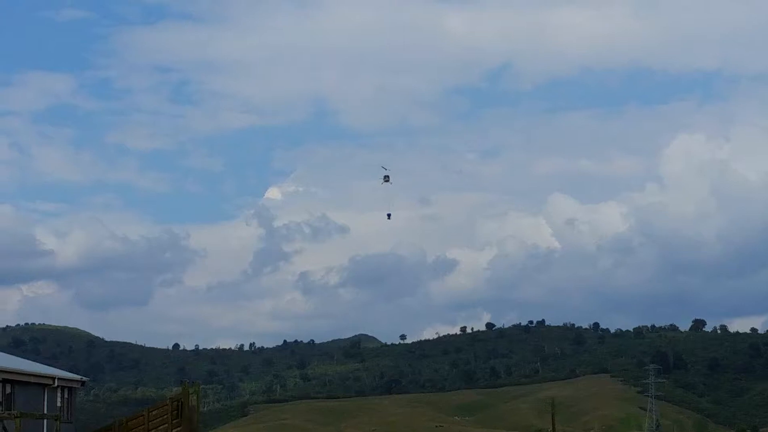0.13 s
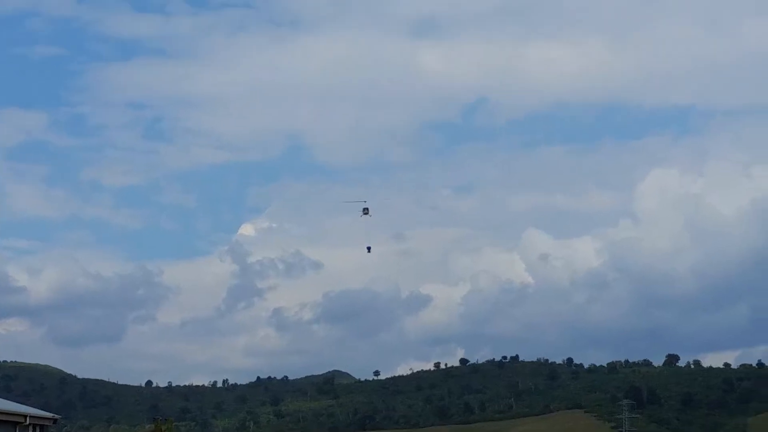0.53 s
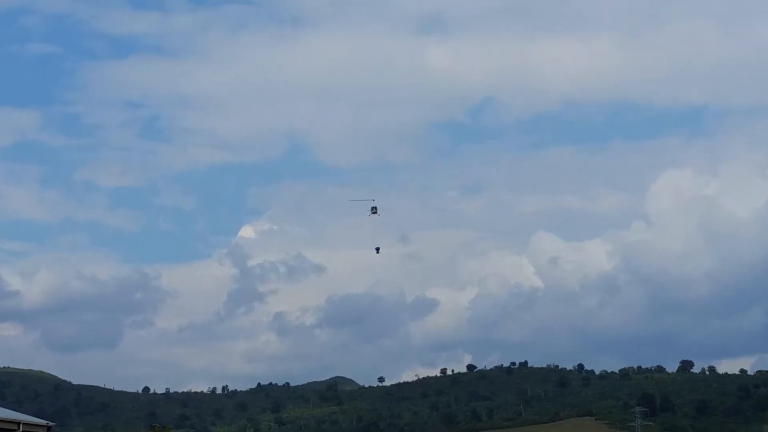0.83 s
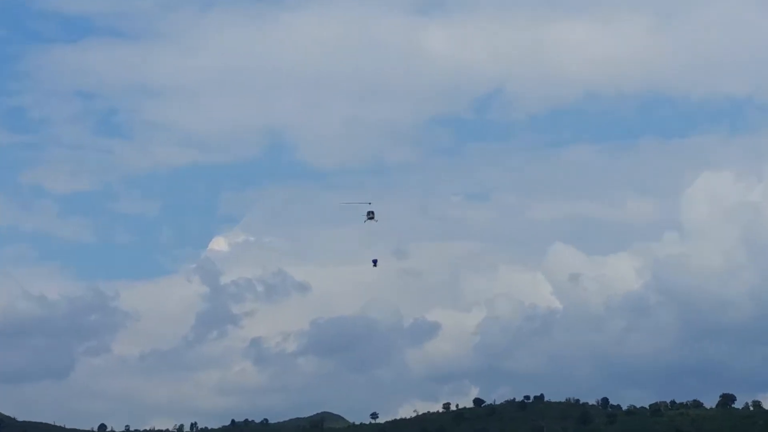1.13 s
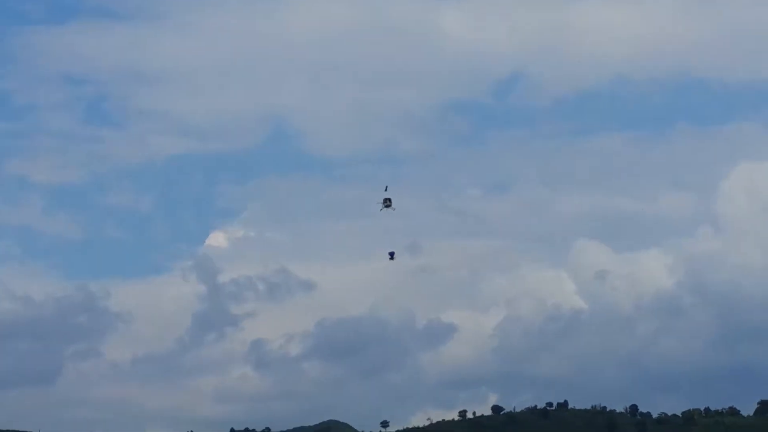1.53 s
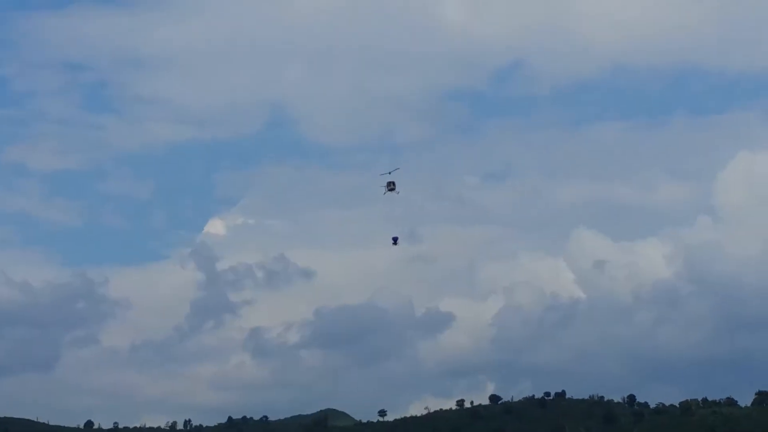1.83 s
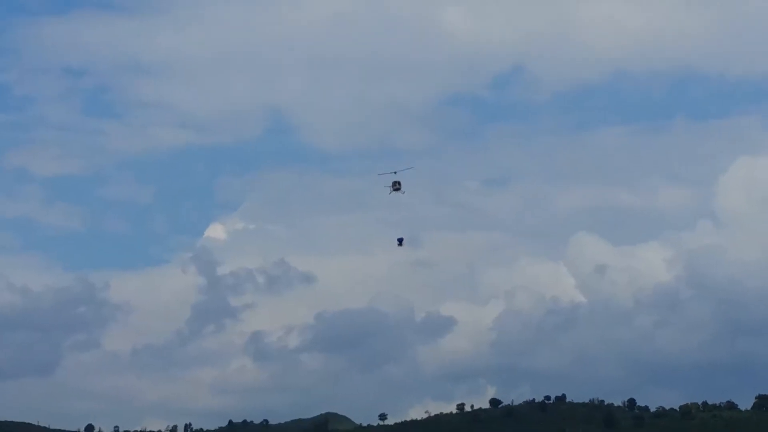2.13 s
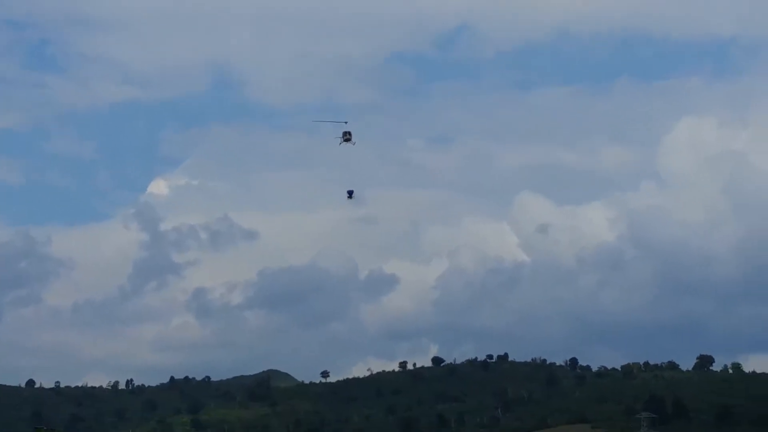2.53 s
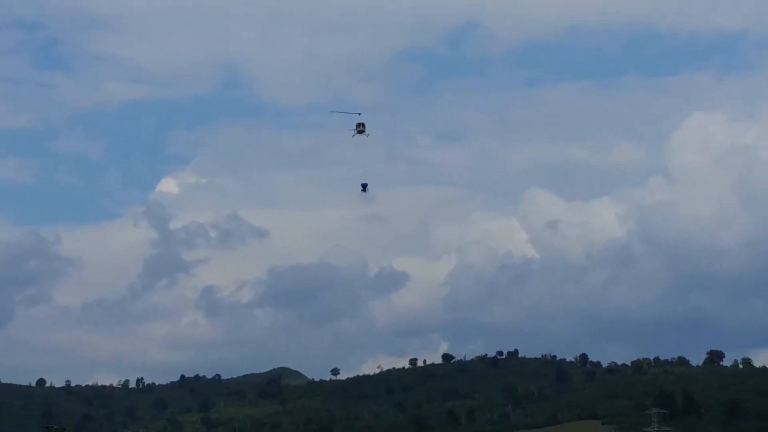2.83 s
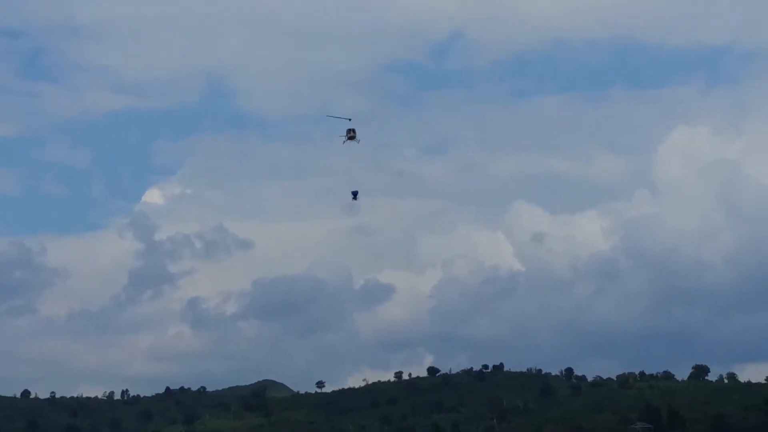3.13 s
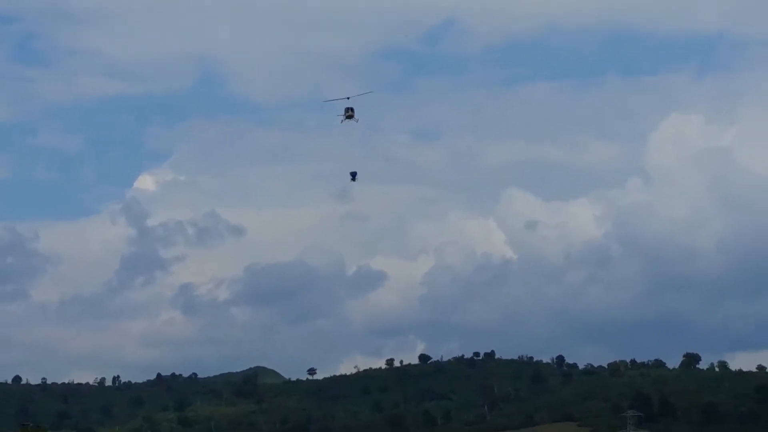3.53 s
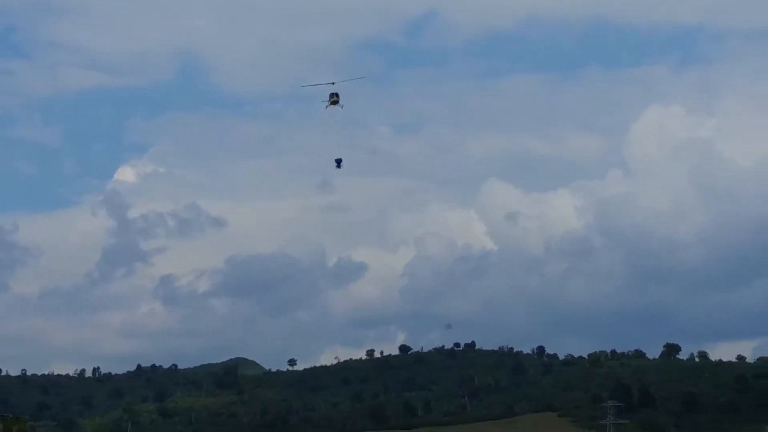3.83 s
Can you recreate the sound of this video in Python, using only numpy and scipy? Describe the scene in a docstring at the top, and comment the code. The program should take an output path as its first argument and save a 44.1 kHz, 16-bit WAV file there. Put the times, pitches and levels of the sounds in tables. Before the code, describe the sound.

Outdoor stereo pickup of a distant helicopter coming closer: steady fast blade thumps, increasingly crisp slaps, engine drone and turbine hiss, thin insect chirps on the left, one tiny close tick early on.

```python
"""Open country, with a two-bladed helicopter coming nearer ahead of the microphone and insects to the left.
After near silence the sound fades in. Each blade pass is a sharp decaying slap of sines, a gated noise swish
and a low thump of filtered pulses, over wavering tail rotor and drive train tones. Rotor wash, turbine,
breeze and the far insect chorus are shaped noise; near insects are scrapes ringing a resonant wing.
One small double tick falls close to the microphone."""
import sys
import numpy as np
from scipy import signal
from scipy.fft import rfft, irfft
from scipy.io import wavfile

SR = 44100
rng = np.random.default_rng(int(sys.argv[2]) if len(sys.argv) > 2 else 0)


def output_pcm(signal):
    """Save a mono or channel-first signal as 16-bit PCM at the path in sys.argv[1].

    Samples are clipped to [-1, 1] before scaling.
    """
    pcm = np.clip(np.atleast_2d(signal).T, -1, 1) * 32767
    wavfile.write(sys.argv[1], SR, np.round(pcm).astype(np.int16))


N = 176400
TIME = np.arange(N) / SR  # seconds
FREQS = np.maximum(np.arange(N // 2 + 1) * SR / N, 1)  # Hz

# Fade-in at the microphone. Each row: time in seconds, level in dB.
FADE = [(0, -89), (.33, -75), (.405, -76), (.424, -28.5), (.47, -14.5), (.55, -7.5), (.62, -2.3)]
CUTOFF_HZ = 14700

# Left minus right of the airborne noise. Each row: frequency in Hz, difference in dB.
BALANCE_DB = [(60, 0), (700, -3), (1200, 2.5), (1550, 1), (1900, -7), (2600, -4.5), (3300, -0.5), (3900, 7),
              (4700, 6.5), (5400, 0)]
# Likeness of left and right. Each row: frequency in Hz, correlation from -1 to 1.
LIKENESS = [(60, -0.067), (160, 0.97), (440, 1), (720, 0.86), (1180, 0.2), (1940, -0.34), (3200, 0.35),
            (5200, -0.58)]
ROTOR_PAN_DB, INSECT_PAN_DB, CHORUS_PAN_DB = -1.0, 20, 8  # left minus right

# Breeze on the microphone, before its level. Each row: frequency in Hz, density in dB per Hz.
BREEZE = [(12, -82), (25, -63.5), (45, -64), (90, -62.5), (150, -73), (200, -77), (280, -70), (350, -73),
          (450, -85), (800, -105)]
# Course of this low two-sided rumble: dips slightly, then rises. Each row: time in seconds, level in dB.
BREEZE_LEVEL = [(.6, -1), (1.8, -1.5), (2.6, -2), (4, 2)]

# Tail rotor harmonics, before waver and course. Each row: multiple of the fundamental, level in dB rms.
TAIL_ORDERS = [(1, -36), (2, -39.5), (3, -43), (4, -49), (5, -61)]
TAIL_HZ = 87.35
# Engine and gearbox tones, before waver and course. Each row: frequency in Hz, level in dB rms.
DRIVE_TONES = [(48.1, -40.5), (96.2, -42), (108.3, -43), (144.4, -40), (147.1, -41), (158.2, -51),
               (172.8, -51), (180.5, -49.5), (204.6, -49.5), (216.6, -55), (228.6, -49.5), (294.1, -44),
               (343.1, -51)]
TONE_WAVER_DB, TONE_WANDER_RAD, TONE_WAVER_HZ = 1.9, 0.23, 2.0
# Course of the drone, louder overall as the helicopter nears. Each row: time in seconds, level in dB.
DRONE_LEVEL = [(.45, -2), (.8, -1.5), (1.2, -0.5), (1.7, 0), (2.2, -0.5), (3, 1.5), (4, 2)]

# Rotor wash, before its level. Each row: frequency in Hz, density in dB per Hz.
WASH = [(15, -96), (35, -66), (60, -65), (110, -61.5), (160, -61.5), (200, -65.5), (300, -67.5), (400, -70),
        (500, -77), (680, -73), (950, -79.5), (1200, -77.5), (1500, -90.5), (1800, -82), (2200, -92),
        (3000, -110)]
# Course of the wash. Each row: time in seconds, level in dB.
WASH_LEVEL = [(.6, -2.5), (1.5, 1), (2.5, 1), (3.3, 1), (3.7, 3.5), (4, 2.5)]
WASH_FLUTTER_DB, WASH_FLUTTER_HZ = 1, 26.7
# Turbine hiss, before its level. Each row: frequency in Hz, density in dB per Hz.
TURBINE = [(1500, -105), (2200, -94.5), (2550, -85), (3050, -96.5), (3500, -90.5), (3950, -81.5),
           (4300, -88), (4800, -90.5), (5300, -99), (5600, -113), (5900, -132), (7000, -138), (10000, -138)]
# Course of the hiss. Each row: time in seconds, level in dB.
HISS_LEVEL = [(.42, 0), (.55, -6), (.7, 0), (2, 1), (3.2, 0.5), (4, 1.5)]
# Turbine whine, before its level. Each row: frequency in Hz, density in dB per Hz.
WHINE = [(3050, -105), (3340, -76.5), (3650, -100), (5500, -122)]
# The whine emerges as the helicopter nears. Each row: time in seconds, level in dB.
WHINE_LEVEL = [(.6, -24), (3.1, -18), (3.55, -4), (4, -1)]

# Far insect chorus, before its swell. Each row: frequency in Hz, density in dB per Hz.
CHORUS = [(10000, -138), (10500, -122), (10900, -105), (11600, -103), (12400, -94), (13500, -99),
          (14500, -100), (16000, -115)]
# Swell of the chorus. Each row: time in seconds, level in dB.
CHORUS_LEVEL = [(.6, -1), (2, 1), (3.2, -1.5), (4, 2)]

# Lateness of the blade passes as the path changes. Each row: time in seconds, delay in ms.
PATH_DELAY = [(.4, -3.5), (.7, -2.5), (1.0, -1), (1.6, 0.12), (2.05, 2), (2.6, 0.5), (3.1, 2.23), (4, 0.85)]
PASS_HZ, FIRST_PASS_S = 14.6994, 0.4028  # before that lateness

# Swish of a blade pass, before gate and level. Each row: frequency in Hz, density in dB per Hz.
SWISH = [(350, -82.5), (500, -65), (680, -77), (1000, -79.5), (1220, -76.5), (1480, -86.5), (1660, -74),
         (1820, -68), (2000, -82), (2230, -81), (2550, -77.5), (2750, -83.5), (3100, -89.5), (4000, -85.5),
         (5000, -92), (5700, -125)]
# Course of the swish. Each row: time in seconds, level in dB.
SWISH_LEVEL = [(.6, -13), (1.5, -2.5), (2.2, -3.5), (2.65, 3), (3.2, 2), (3.7, 2.5), (4, 0.5)]
SWISH_START_S = -0.0017  # against the slap
SWISH_ATTACK_S, SWISH_HOLD_S, SWISH_RELEASE_S = 0.0026, 0.0098, .0045  # hold counts from the start

# Slap strength of the first blade. Each row: time in seconds, level of the main burst in dB.
SLAP_BLADE_A = [(.6, -34), (.8, -32), (1.22, -34.5), (1.355, -28), (1.49, -20.5), (1.63, -20),
                (1.76, -31.5), (2.04, -30.5), (2.17, -29), (2.31, -26), (2.44, -25.5), (2.58, -19),
                (2.72, -21), (2.85, -19.5), (3.12, -25), (3.26, -23.5), (3.67, -19), (3.94, -24)]
# Slap strength of the second blade. Each row: time in seconds, level of the main burst in dB.
SLAP_BLADE_B = [(0.6, -48), (1.02, -37), (1.42, -41), (1.559, -29.5), (1.70, -23.5), (1.83, -36),
                (1.97, -26.5), (2.10, -27.5), (2.24, -23.5), (2.38, -39), (2.51, -24.5), (2.651, -31.5),
                (2.78, -27.5), (2.92, -27), (3.062, -31.5), (3.33, -26), (3.46, -27.5), (3.6, -24.5),
                (3.87, -28)]
SLAP_HZ, SLAP_RISE_S, SLAP_FALL_S, SLAP_PITCH_SPREAD = 690, 0.0022, 0.002, 0.03
# Parts of the slap, in dB against the main burst
SLAP_CRACK_HZ, SLAP_CRACK_DB = 1180, -17
SLAP_BODY_HZ, SLAP_BODY_DB = 394, -9
SLAP_RING_HZ, SLAP_RING_DB, SLAP_RING_LAG_S = 1778, -28, 0.0012
ECHO_LAG_S, ECHO_LAG_SPREAD_S, ECHO_DB = 0.00504, .0006, -14.5  # ground reflection, dB against the slap

# Thump of a blade pass, before its course. Each row: frequency in Hz, level of a harmonic there in dB rms.
THUMP = [(15, -63), (29, -45.5), (44, -44.5), (59, -40), (73, -36), (88, -39), (103, -48), (118, -40.5),
         (132, -48.5), (162, -53), (190, -60.5), (260, -57.5), (320, -59), (400, -61), (500, -77.5),
         (700, -100)]
# Course of the thump. Each row: time in seconds, level in dB, lag behind the slap in ms.
THUMP_COURSE = [(.5, -1, 7), (1.1, -2, 6.8), (1.65, 2.5, 6.2), (2.1, 1, 7), (2.45, -1.5, 6.5),
                (2.95, 3, 8.05), (3.4, 1, 7.8), (4, 1.5, 10)]
THUMP_SKEW_RAD, THUMP_SPREAD_DB, THUMP_JITTER_S = 0.29, 0.32, 0.0004

# Longer insect rattles. Each row: start in seconds, length in seconds, frequency in Hz, width in Hz,
# scrapes per second, decay of a scrape in seconds, level in dB rms before the high-pass and pan.
RATTLES = [(0.601, 0.18, 12500, 1390, 114, .003, -60), (.8, .15, 11850, 700, 100, .004, -66.5),
           (1.306, 0.06, 12240, 1230, 100, .004, -61), (1.42, 0.16, 12300, 1700, 106, .005, -63),
           (1.674, 0.25, 12800, 1110, 91, 0.005, -53.5), (1.845, 0.66, 12530, 1496, 86, 0.006, -62),
           (2.201, 0.23, 13300, 2100, 220, .002, -61.5), (2.546, 0.22, 12600, 1500, 78, 0.006, -64),
           (2.779, 0.32, 12670, 1010, 130, .006, -63.5), (3.202, 0.43, 10700, 1400, 47, 0.02, -62.5),
           (3.5, 1, 10540, 1100, 69, 0.019, -57), (3.56, 0.16, 12700, 586, 260, .003, -64)]
# Short insect chirps. Each row: start in seconds, level in dB rms before the high-pass and pan.
CHIRPS = [(0.786, -57.5), (.995, -60.5), (1.176, -57.5), (1.385, -59.5), (1.605, -56), (2.405, -59),
          (2.604, -62), (2.774, -59), (2.949, -59), (3.142, -59), (3.331, -60)]
CHIRP_S, CHIRP_HZ, CHIRP_WIDTH_HZ, CHIRP_CLICKS_PER_S = .046, 13200, 1900, 138
INSECT_CLICK_S, INSECT_LOW_EDGE_HZ = .0022, 10700
RATTLE_EDGE_SHARE = .12  # of a song's length, for the slope of its edges

# Small tick near the microphone. Each row: start in seconds, frequency in Hz,
# starting level in dB before the low-pass, decay in seconds.
TICK = [(1.2722, 2140, -26.5, 0.00093), (1.2748, 960, -25, 0.00096)]
TICK_DULL_HZ = 2800


def from_db(db):
    """Decibels to gain."""
    return 10 ** (np.asarray(db) / 20)


def along(rows, s, axis=1):
    """A table's column at the given times, in straight lines between rows."""
    rows = np.array(rows)
    return np.interp(s, rows[:, 0], rows[:, axis])


def at_hz(points):
    """A spectrum table on the frequency grid, interpolated over log frequency."""
    hz, value = np.transpose(points)
    return np.interp(np.log(FREQS), np.log(hz), value)


def band_gain(points):
    """Gain of a spectrum table, falling steeply above twice its last frequency."""
    return from_db(at_hz(points)) / (1 + (FREQS / points[-1][0] / 2) ** 10)


def pan(db):
    """Left and right gains for a level difference, at constant power."""
    gains = from_db(np.array([[.5], [-.5]]) * db)
    return gains / np.sqrt(np.mean(gains ** 2, axis=0))


def drift(rate_hz):
    """Random wander with spread 1, mostly slower than the given rate."""
    slow = irfft(rfft(rng.standard_normal(N)) / (1 + (FREQS / rate_hz) ** 2), N)
    return slow / slow.std()


def air_noise(spectrum, balance_db):
    """Stereo noise of a given density, its two sides as alike at each frequency as the table says."""
    mid, side = rfft(rng.standard_normal((2, N)))
    alike = np.clip(at_hz(LIKENESS), -1, 1)
    opposed = np.array([[1], [-1]])
    both = np.sqrt(1 + alike) * mid + np.sqrt(1 - alike) * side * opposed
    return irfft(both * band_gain(spectrum) * pan(balance_db), N) * np.sqrt(SR) / 2


def breeze():
    """A faint low buffeting at the microphone, unrelated in the two channels."""
    noise = irfft(rfft(rng.standard_normal((2, N))) * band_gain(BREEZE), N) * np.sqrt(SR / 2)
    return from_db(along(BREEZE_LEVEL, TIME)) * noise


def drone():
    """Tail rotor harmonics and drive train tones, wavering in the moving air."""
    tail_tones = [(order * TAIL_HZ, db) for order, db in TAIL_ORDERS]
    out = np.zeros(N)
    for hz, db in tail_tones + DRIVE_TONES:
        phase = 2 * np.pi * (hz * TIME + rng.random()) + TONE_WANDER_RAD * drift(TONE_WAVER_HZ)
        level = from_db(db + TONE_WAVER_DB * drift(TONE_WAVER_HZ))
        out += np.sqrt(2) * level * np.sin(phase)  # rms to peak
    return from_db(along(DRONE_LEVEL, TIME)) * out


def rotor_wash():
    """Fluttering rumble of the downwash: low noise with a quickly wandering level."""
    level = from_db(along(WASH_LEVEL, TIME) + WASH_FLUTTER_DB * drift(WASH_FLUTTER_HZ))
    return level * air_noise(WASH, at_hz(BALANCE_DB))


def turbine():
    """The turbine's broad hiss and its emerging whine, a narrower band of noise."""
    hiss = from_db(along(HISS_LEVEL, TIME)) * air_noise(TURBINE, at_hz(BALANCE_DB))
    whine = from_db(along(WHINE_LEVEL, TIME)) * air_noise(WHINE, at_hz(BALANCE_DB))
    return hiss + whine


def insect_chorus():
    """Far insects merged into a high band of noise, stronger on the left."""
    return from_db(along(CHORUS_LEVEL, TIME)) * air_noise(CHORUS, CHORUS_PAN_DB)


def blade_passes():
    """Arrival times of an even beat of blade passes, shifted as the path changes."""
    s = np.arange(FIRST_PASS_S, N / SR, 1 / PASS_HZ)
    return s + along(PATH_DELAY, s) / 1000  # ms to s


def swishes(passes):
    """Turbulence hisses while the advancing blade points at the listener, then dies away."""
    gate = np.zeros(N)
    for s in passes:
        near = (TIME > s + SWISH_START_S) & (TIME < s + 1 / PASS_HZ)
        t = TIME[near] - s - SWISH_START_S
        attack = np.minimum(t / SWISH_ATTACK_S, 1)
        gate[near] += attack * np.exp(-np.maximum(t - SWISH_HOLD_S, 0) / SWISH_RELEASE_S)
    return gate * from_db(along(SWISH_LEVEL, TIME)) * air_noise(SWISH, at_hz(BALANCE_DB))


def slaps(passes):
    """The blades take turns cutting a tip vortex: a short burst with low body, bright ring and ground echo."""
    out = np.zeros(N)
    for k, s in enumerate(passes):
        detune, turn, late = rng.standard_normal(3)
        near = np.abs(TIME - s) < 1 / PASS_HZ / 2
        t = TIME[near] - s
        shape = np.exp(-(t / np.where(t < 0, SLAP_RISE_S, SLAP_FALL_S)) ** 2)
        angle = 2 * np.pi * t * (1 + SLAP_PITCH_SPREAD * detune)
        burst = shape * np.sin(angle * SLAP_HZ + turn)
        crack = from_db(SLAP_CRACK_DB) * shape ** 2 * np.sin(angle * SLAP_CRACK_HZ)
        ring_shape = np.exp(-((t - SLAP_RING_LAG_S) / SLAP_FALL_S) ** 2)
        ring = from_db(SLAP_RING_DB) * ring_shape * np.sin(angle * SLAP_RING_HZ)
        body = from_db(SLAP_BODY_DB) * np.sqrt(shape) * np.sin(angle * SLAP_BODY_HZ + turn)
        slap = burst + crack + ring + body
        echo_lag = ECHO_LAG_S + ECHO_LAG_SPREAD_S * late
        echo = from_db(ECHO_DB) * np.interp(t - echo_lag, t, slap)
        blade = (SLAP_BLADE_A, SLAP_BLADE_B)[k % 2]
        out[near] += from_db(along(blade, s)) * (slap + echo)
    return out


def thumps(passes):
    """Each blade pushes one rounded pressure pulse ahead of it: a kick shaped by the thump's spectrum."""
    size, late = rng.standard_normal((2, len(passes)))
    lag = along(THUMP_COURSE, passes, axis=2) / 1000  # ms to s
    s = passes + lag + THUMP_JITTER_S * late
    kicks = np.zeros(N)
    places = np.clip((s * SR).astype(int), 0, N - 1)
    kicks[places] = from_db(along(THUMP_COURSE, s) + THUMP_SPREAD_DB * size)
    pulses = irfft(rfft(kicks) * band_gain(THUMP) * np.exp(1j * THUMP_SKEW_RAD), N)
    return pulses * SR / PASS_HZ / np.sqrt(2)  # so the table gives the rms of each harmonic


def stridulation(start, length, hz, width_hz, rate, decay, db):
    """A run of tiny noise scrapes rings an insect's wing, a resonance passed twice."""
    t = np.arange(int(length * SR)) / SR
    scrapes = np.exp(-(t % (1 / rate)) / decay) * rng.standard_normal(len(t))
    to_edge = np.minimum(t, length - t)
    scrapes = scrapes * np.clip(to_edge / (RATTLE_EDGE_SHARE * length) + .3, 0, 1)
    r = np.exp(-np.pi * width_hz / SR)
    wing = [1, 0.015, -1], [1, -2 * r * np.cos(2 * np.pi * hz / SR), r * r]
    song = signal.lfilter(*wing, signal.lfilter(*wing, scrapes))
    return np.pad(from_db(db) * song / song.std(), (int(start * SR), N))[:N]


def near_insects():
    """Chirps and rattles in the grass, far to the left, with everything low filtered out."""
    chirp = CHIRP_S, CHIRP_HZ, CHIRP_WIDTH_HZ, CHIRP_CLICKS_PER_S, INSECT_CLICK_S
    songs = [(s, *chirp, db) for s, db in CHIRPS] + RATTLES
    high_pass = signal.butter(14, INSECT_LOW_EDGE_HZ, "high", fs=SR, output="sos")
    near = signal.sosfilt(high_pass, sum(stridulation(*song) for song in songs))
    return pan(INSECT_PAN_DB) * near


def tick():
    """A small double tick of dulled sines that die at once."""
    out = np.zeros(N)
    for s, hz, db, decay in TICK:
        t = np.maximum(TIME - s, 0)
        out += from_db(db) * np.exp(-t / decay) * np.sin(2 * np.pi * hz * t)
    return signal.sosfilt(signal.butter(4, TICK_DULL_HZ, fs=SR, output="sos"), out)


def scene():
    """The helicopter ahead, insects to the left, breeze and a tick at the microphone."""
    passes = blade_passes()
    air = breeze() + rotor_wash() + turbine() + swishes(passes)
    rotors = pan(ROTOR_PAN_DB) * (drone() + slaps(passes) + thumps(passes))
    return air + rotors + insect_chorus() + near_insects() + tick()


def record(dry):
    """The sound fades in and the top is cut."""
    low_pass = signal.ellip(10, .1, 80, CUTOFF_HZ, fs=SR, output="sos")
    return signal.sosfilt(low_pass, dry * from_db(along(FADE, TIME)))


dry = scene()
out = record(dry)
output_pcm(out)
```